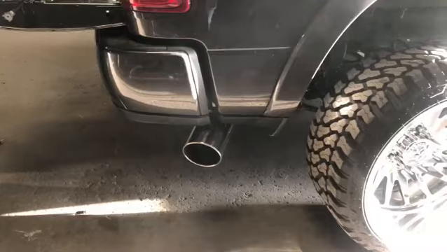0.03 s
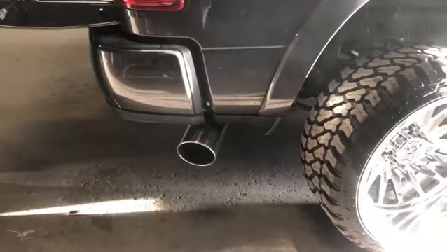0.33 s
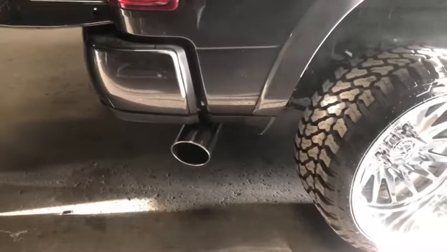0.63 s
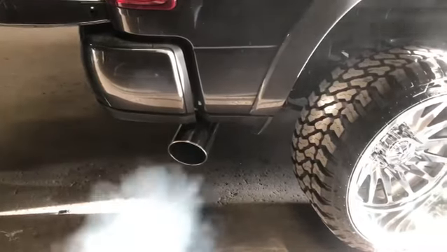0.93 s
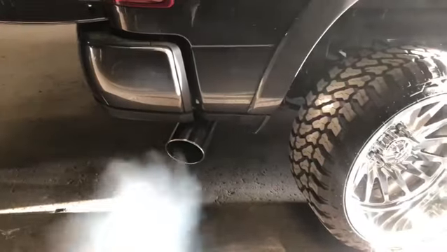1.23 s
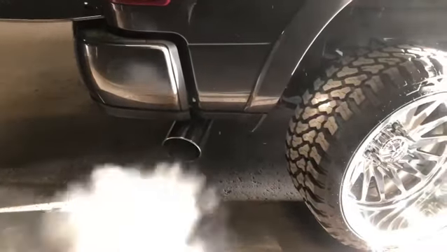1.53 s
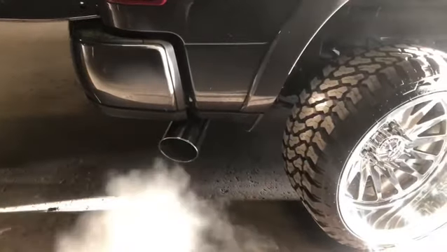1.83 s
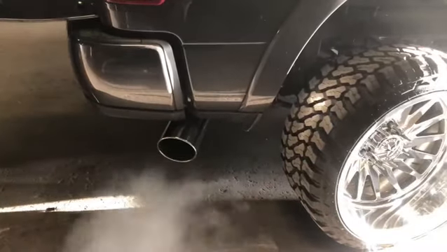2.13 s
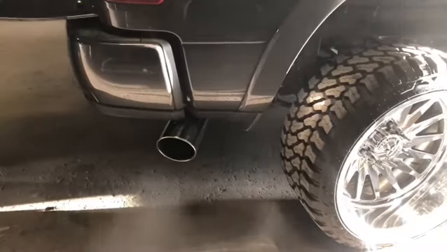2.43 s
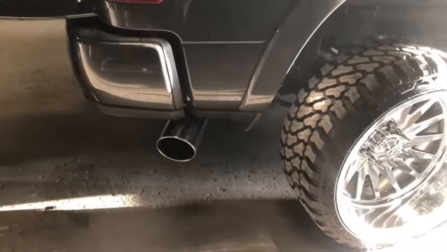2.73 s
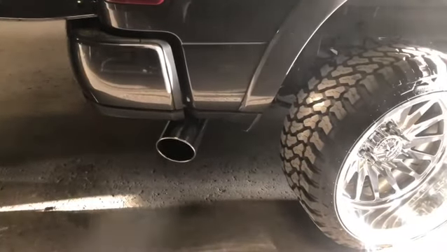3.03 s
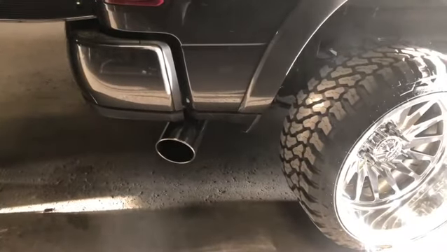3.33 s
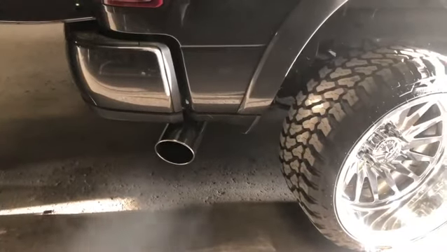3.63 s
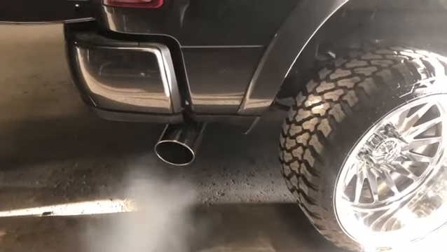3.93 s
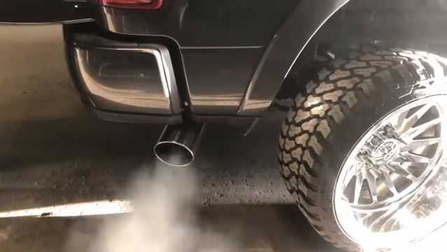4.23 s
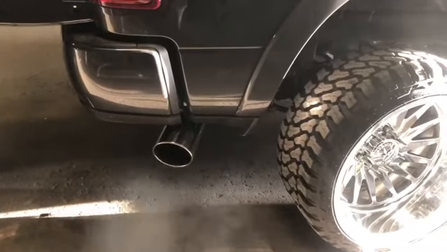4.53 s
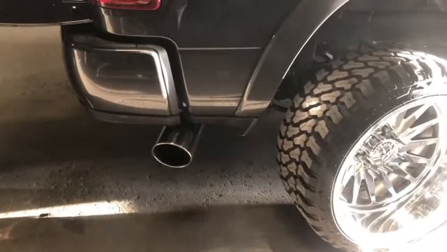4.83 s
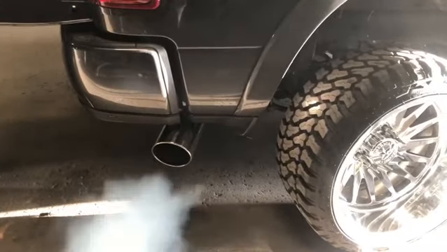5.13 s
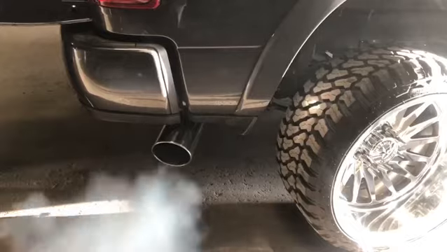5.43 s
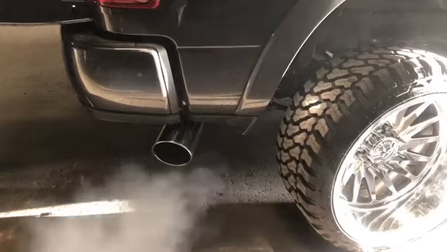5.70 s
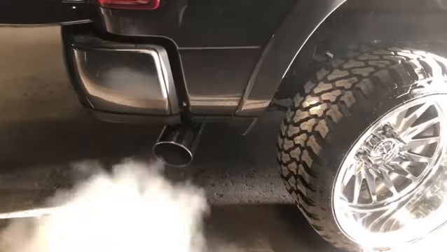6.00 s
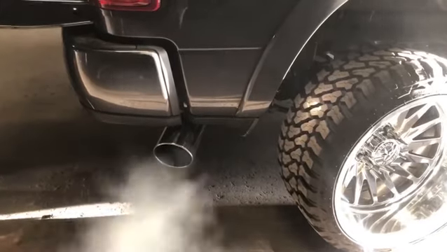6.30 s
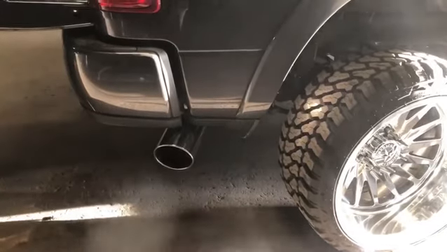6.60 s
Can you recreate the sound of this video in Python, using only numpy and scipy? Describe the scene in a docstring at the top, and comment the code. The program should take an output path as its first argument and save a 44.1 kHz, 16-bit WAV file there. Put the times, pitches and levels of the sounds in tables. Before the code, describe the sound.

A diesel pickup idles briefly, then revs three times with a throbbing, rasping exhaust bark and a faint turbo whine between revs.

```python
"""Outdoors among walls, by the tailpipe of a straight-six turbo diesel pickup: it idles, revs three times.
Firing pulses ring the pipe into a throb and a bark, under a drone of booming crankshaft orders.
Gas rasps, hisses and spits at the mouth and buffets the air; a howl climbs as boost builds.
Thin metal chirps as the first rev takes hold, and the turbo whines down between the revs.
The ground and nearby walls answer."""
import sys
import numpy as np
from scipy import signal
from scipy.fft import rfft, irfft, next_fast_len
from scipy.io import wavfile
from scipy.ndimage import uniform_filter1d

SR = 44100
rng = np.random.default_rng(int(sys.argv[2]) if len(sys.argv) > 2 else 0)


def unload_wav(signal):
    """Save mono or channel-first audio to the path in sys.argv[1] as 16-bit WAV at rate SR, clipped to [-1, 1]."""
    wavfile.write(
        sys.argv[1],
        SR,
        np.round(np.clip(np.atleast_2d(signal).T, -1, 1) * 32767).astype(np.int16),
    )


N = 293706

# pedal moves: start_s, target_turns_per_s, fuel_share, gas_flow (1 is about full), flow_glide_s
PEDAL = [(0.431, 50.2, 0.99, 1, 0.048), (1.1, 58.3, 1, 0.93, 0.092), (1.369, 34.8, 0.1, 0.44, 0.096),
         (1.45, 7.06, 0, 0.06, 0.063), (2.765, 43.1, 0.77, 0.67, 0.11), (3.12, 36.9, 0.57, 0.53, 0.065),
         (3.361, 47.6, 1, 0.84, 0.23), (3.75, 34.2, 0.47, 0.68, 0.079), (3.84, 7, 0.1, 0.17, 0.34),
         (4.775, 50.3, 1, 0.86, 0.05), (5.1, 57.5, 0.98, 1.05, 0.12), (5.619, 32.4, 0, 0.9, 0.061),
         (5.799, 6.5, 0.01, 0.02, 0.44)]
# the three firings of one crankshaft turn: size_db, late_turns
FIRINGS = [(11.5, 0.0016), (4.5, 0.0328), (4.5, -0.0162)]
# how the exhaust system favours an order gliding through it: pitch_hz, gain_db
BOOM = [(40, -49), (60, -22), (72, -26.5), (85, -35), (97, -12.5), (115, -9.5), (135, -12.5), (150, -3),
        (172, 2.5), (185, -1.5), (200, 6), (218, -6.5), (240, 0), (270, -8.5), (305, -5), (340, -16),
        (380, -1), (403, -10.5), (425, -10.5), (460, -8), (510, -7), (555, -5), (597, -1), (640, -3),
        (690, -0.5), (760, -3), (810, -5), (900, -9), (1000, -16)]


def exhaust(speed, turns, fuel, gas_db):
    """Firing pulses ring the pipes and tear the gas; a louder bark brings a harder, loaded tone."""
    throb_db, bark_db, rasp_db, hiss_db, fizz_db = gas_db
    load = np.clip((bark_db + 37.5) / 13, 0, 1)
    lope = (1 - load) * np.cos(2 * np.pi * turns)  # running light, it chugs once a turn
    pulses = steady(firings(turns, scatter_db=-1.0, jitter_turns=0.0017, rebound_db=-9.5))
    rough = steady(puffs(pulses, decay_s=0.0085, depth=0.17, flutter_db=5.0))
    return (amp(throb_db - 1.5 + 2.5 * lope) * throb(turns, rough, load)
            + amp(bark_db - 1.43) * growl(speed, turns, fuel, bark(pulses, rough, load))
            + amp(rasp_db - 1.5 + 0.38 * lope) * (rasp(pulses, load) + howl(speed, turns, fuel))
            + hiss(pulses, load, hiss_db, fizz_db))


def firings(turns, scatter_db, jitter_turns, rebound_db):
    """One pulse per firing, uneven from cylinder to cylinder, and its rebound half a firing later."""
    count = len(FIRINGS)
    k = np.arange(int(turns[-1] * count))
    size_db, late = np.array(FIRINGS)[k % count].T
    chance = rng.standard_normal((len(k), 2))
    angle = k / count + late + jitter_turns * chance[:, 0]
    size = amp(size_db + scatter_db * chance[:, 1])
    train = lambda at: np.bincount(np.interp(at, turns, np.arange(N)).astype(int), size, N)
    return train(angle) + amp(rebound_db) * train(angle + .5 / count)


def puffs(pulses, decay_s, depth, flutter_db):
    """Turbulence that leaps at each pulse and dies away, over a steady stream."""
    gate = steady(signal.lfilter([1], [1, -np.exp(-1 / (decay_s * SR))], pulses))
    share = np.clip(depth, 0, 1)
    return (1 - share + share * gate) * amp(flutter_db * wobble(380)) * rng.standard_normal(N)


def throb(turns, rough, load):
    """Uneven firings burble in the pipe's lowest resonances; load tightens them into a thrum."""
    # pipe resonances: pitch_hz, width_hz, level_db
    pipe = [(106, 50, -6), (132, 6.1, 0), (163, 11, 0.5), (198.4, 7.8, -2), (252.4, 29, -3.5),
            (269.5, 12.6, -9), (293.7, 19.5, -5)]
    loose = firings(turns, scatter_db=6.0, jitter_turns=0.021, rebound_db=-30)
    tight = steady(firings(turns, scatter_db=-4.0, jitter_turns=0.0088, rebound_db=-51.0))
    burble = ring(loose, pipe, low_hz=104.3, high_hz=229.4)
    thrum = ring(tight + 0.62 * rough, pipe, low_hz=142.4, high_hz=348)
    return blend(burble, thrum, load)


def bark(pulses, rough, load):
    """Pulses and rough gas ring the tailpipe into a ragged midrange bark."""
    # tailpipe resonances: pitch_hz, width_hz, level_db
    tailpipe = [(375.5, 13, 1), (412.7, 23, -0.5), (488, 55, -4.5), (534.4, 20, 0.5), (577, 77, -4.5),
                (659, 63, -2), (712, 44, -3.5), (805, 86, -1.5), (834, 51, -0.5), (896, 41, -9),
                (990, 49, -18.5)]
    drive = pulses * (0.43 + 0.53 * load) + 0.87 * rough
    return steady(ring(drive, tailpipe, low_hz=289, high_hz=956))


def growl(speed, turns, fuel, ragged):
    """As revs climb, the ragged bark locks into clean upper orders that swell across resonances."""
    # shaft orders singing through the tailpipe: order, fuelled_db, unfuelled_db
    upper_orders = [(13, -3, -4), (14, -7, 3), (15, 3.5, -1), (16, 1, -6), (17, 2.5, 4.5), (18, 5.5, 0),
                    (19, -3, -4), (20, -2, -1), (21, 1.5, -5), (22, -2, -4), (23, 1.5, 1), (24, -1, -6),
                    (25, -4, -6), (26, -5, -9), (27, -3, -9)]
    # pitched part of the bark's power: turns_per_s, fuelled_share, unfuelled_share
    pitched_share = [(17, .2, 0), (21, .35, .1), (27, .68, .52), (32, .86, .72)]
    tones = np.zeros(N)
    for order, pull_db, coast_db in upper_orders:
        db = fuel * pull_db + (1 - fuel) * coast_db + along(BOOM, order * speed) + 1.5 * wobble(12)
        tones += amp(db) * np.cos(2 * np.pi * (order * turns + rng.random()) + 0.15 * wobble(25))
    pulling, coasting = lookup(pitched_share, speed)
    share = np.clip(fuel * pulling + (1 - fuel) * coasting, 0, 1)
    return np.sqrt(1 - share) * ragged + np.sqrt(share) * steady(tones, size=8000)


def drone(speed, turns, fuel, surge_db):
    """Low shaft orders boom as they glide through the pipe's resonances; unfuelled they chug."""
    # the lead tone in the pipe's resonances: pitch_hz, fuelled_db, unfuelled_db
    lead_levels = [(80, -37, -49), (96, -18.5, -35), (107.6, -11, -40.5), (121.3, -17.5, -28.5),
                   (127.6, -25.5, -19), (137, -22.5, -22), (152.5, -13.5, -17), (165, -12.5, -11),
                   (189, -20, -20.5), (198, -12, -15), (212, -17.5, -21.5)]
    # weaker shaft orders: order, fuelled_db, unfuelled_db
    weak_orders = [(2, -28, -8.5), (3, -28, -14.5), (4, -20.5, -22), (5, -19.5, -25), (7, -26.5, -27),
                   (8, -32.5, -22), (9, -23, -24.5), (10, -35, -28), (11, -27, -22.5), (12, -21.5, -25.5)]
    # unfuelled, they collapse at low revs: turns_per_s, gain_db
    collapse = [(18.5, -17), (22, -9), (25, -4), (28, -1)]

    def tone(order, pull_db, coast_db, drift):
        db = fuel * pull_db + (1 - fuel) * (coast_db + 1.6 * wobble(24)) + 1.7 * wobble(25)
        return np.sqrt(2) * amp(db) * np.cos(2 * np.pi * order * turns + drift + 0.055 * wobble(30))

    lead = 2 * len(FIRINGS)  # twice the firing rate
    out = amp(surge_db) * tone(lead, *lookup(lead_levels, lead * speed), drift=0)
    slack_db, = lookup(collapse, speed)
    for order, pull_db, coast_db in weak_orders:
        drift = np.pi * wobble(2)  # the weaker tones drift in phase and blend into a smooth drone
        out += amp(along(BOOM, order * speed)) * tone(order, pull_db, coast_db + slack_db, drift)
    return out


def rasp(pulses, load):
    """Gas tears at the pipe's mouth: a rattle running light, deeper puffs under load."""
    # rasp colour, running light and loaded: freq_hz, gain_db
    light_rasp = [(700, -23), (860, -13), (1020, -18), (1150, -2.5), (1290, 3), (1420, -2.5), (1630, -7.5),
                  (1780, 2), (1950, -11.5), (2080, -5.5), (2250, -6), (2450, -4), (2750, -14), (2950, -42),
                  (3400, -35)]
    loaded_rasp = [(850, 0.5), (1000, -8), (1130, -0.5), (1280, 3), (1480, 1.5), (1640, -6.5), (1760, 5.5),
                   (2050, -2), (2250, -7.5), (2480, -2.5), (2750, -1), (2980, -8.5), (3500, -5)]
    tearing = puffs(pulses, decay_s=0.012, depth=0.11 + 0.45 * load, flutter_db=2)
    return blend(coloured(tearing, light_rasp), coloured(tearing, loaded_rasp), load)


def howl(speed, turns, fuel):
    """Under boost a flow resonance whoops up through the rasp, beating with the firings."""
    # the climbing resonance: turns_per_s, pitch_hz, level_db
    climb = [(24.52, 900, -17), (25.8, 1020, 0), (26.89, 1200, -1.5), (28.86, 1400, 1.5),
             (30.08, 1490, 2.5), (31.15, 1780, 3.5), (32.47, 2050, -1), (33.51, 2500, -3.5),
             (34.96, 2900, -6)]
    # the pipe's colour on it: freq_hz, gain_db
    pipe_colour = [(700, -20), (1000, -1.5), (1250, -1.5), (1500, 3), (1640, -8), (1770, 1.5), (2080, 0),
                   (2300, -9), (2550, -3), (2900, -2), (3400, -12)]
    beat = 1 + 0.26 * np.cos(2 * np.pi * len(FIRINGS) * turns)
    hz, db = lookup(climb, speed)
    core = steady(narrow_noise(hz, width_hz=230), size=900)
    skirt = narrow_noise(1.05 * hz, width_hz=850)
    whoop = amp(-4.5) * core + amp(-2.5) * skirt
    return coloured(fuel ** 2 * amp(db + wobble(60)) * whoop * beat, pipe_colour)


def hiss(pulses, load, hiss_db, fizz_db):
    """The free jet hisses in puffs, with a fizz on top."""
    # hiss and fizz colours, running light and loaded: freq_hz, gain_db
    light_hiss = [(2700, -2), (3130, 0.5), (3350, 0), (3580, 3), (3760, 6), (4000, -7), (4200, 3),
                  (4700, -1.5), (5100, 0), (5850, 2.5), (6450, -10), (7400, -15.5), (8800, -27)]
    loaded_hiss = [(2600, -62), (3100, 4), (3400, -6), (3800, 6.5), (4250, 3), (4750, 6.5), (5400, 4.5),
                   (5900, 3), (6500, 0.5), (7500, -2), (9000, -16)]
    light_fizz = [(6200, -14), (7400, -5.5), (8800, 0), (11000, -3), (12300, -6), (13000, -8), (15700, -21)]
    loaded_fizz = [(6200, -18), (7500, -6.5), (9000, 2), (10500, -1), (12200, -3), (12900, -15),
                   (14500, -11), (15700, -38)]
    jet = puffs(pulses, decay_s=0.015, depth=0.051 + 0.33 * load, flutter_db=1.0)
    body = blend(coloured(jet, light_hiss), coloured(jet, loaded_hiss), load)
    fizz = blend(coloured(jet, light_fizz), coloured(jet, loaded_fizz), load)
    return amp(hiss_db - 0.42) * body + amp(fizz_db - 0.6) * fizz


def idle(turns):
    """Before the first rev, neighbouring shaft orders beat into a slow lope."""
    # tones standing in the pipe: order, level_db
    idle_orders = [(6, -31.5), (9, -29.5), (10, -57), (11, -25.5), (12, -31), (17, -34)]
    # how far the engine has settled into idle: time_s, gain_db
    settling = [(.08, -17), (.16, -4), (.43, 2.5), (.52, 5), (.6, -83)]
    tones = sum(amp(db + 1.1 * wobble(9.5)) * np.cos(2 * np.pi * order * turns + 0.19 * wobble(7))
                for order, db in idle_orders)
    return np.sqrt(2) * amp(curves(settling)[0]) * tones


def spits():
    """Short cracks of gas, each with a dull thump."""
    # spits in the exhaust: start_s, level_db, thump_gain_db
    hits = [(0.4569, -16, 6), (.482, -12, 8), (1.2935, -2, -21), (1.698, -15, 11), (5.5862, 2.5, -4)]
    out, t = np.zeros(N + SR), np.arange(SR // 20) / SR
    for s, db, thump_db in hits:
        crack = amp(-4.5 - 60 * t / 0.04) * rng.standard_normal(len(t))
        thump = amp(thump_db + 4.5 - 60 * t / 0.0091) * np.sin(2 * np.pi * 480 * t)
        out[round(s * SR):][:len(t)] += amp(db) * (crack + thump)
    return coloured(out[:N], [(100, -3), (2000, 2.5), (5000, 0.5), (10000, -4.5), (15500, -34)])


def chirps():
    """Thin metal rings briefly as the first rev takes hold."""
    # metallic pings: start_s, pitch_hz, level_db, t60_s
    pings = [(.456, 3700, -9, 0.04), (.478, 5400, -18, 0.04)]
    out, t = np.zeros(N), np.arange(SR // 10) / SR
    attack = 1 - np.exp(-t / 0.0015)
    for s, hz, db, t60 in pings:
        out[round(s * SR):][:len(t)] += amp(db - 60 * t / t60) * attack * np.sin(2 * np.pi * hz * t)
    return out


def turbo():
    """The thin, airy whine of the turbo's blades coasting down."""
    # one list per coast: time_s, pitch_hz, level_db
    coasts = [
        [(2.25, 11800, -61), (2.42, 10800, -46), (2.55, 9950, -43), (2.63, 9400, -50), (2.72, 9030, -42),
         (2.78, 9090, -38), (2.92, 9700, -50)],
        [(4.4, 11600, -58), (4.56, 10700, -44.5), (4.68, 10050, -44.5), (4.77, 9750, -51), (4.85, 10030, -56)],
    ]
    out, t = np.zeros(N), np.arange(N) / SR
    for rows in coasts:
        hz, db = curves(rows)
        sounding = (t > rows[0][0]) & (t < rows[-1][0])
        out += sounding * amp(db + 1.5 * wobble(30)) * narrow_noise(hz, width_hz=750)
    return out


def buffet(level_db):
    """The stream of gas buffets the air in front of the pipe: a low, gusty rumble."""
    rumble = coloured(rng.standard_normal(N), [(10, -8), (28, -25), (45, -1), (110, 3)])
    return amp(level_db + 10 + 2.0 * wobble(7)) * steady(rumble, size=8000)


def walls(x):
    """A short, diffuse echo off the ground and walls, dying sooner in the treble."""
    # decay off the ground and walls: freq_hz, t60_s
    decay = [(150, 0.48), (1500, 0.14), (10000, 0.042)]
    size = SR // 4  # a fresh tail each quarter second evens out the colouring
    count = N // size + 1
    blocks = np.pad(x, (0, count * size - N)).reshape(count, size)
    hz, t, noise = signal.stft(rng.standard_normal((count, size)), SR, nperseg=256)
    tails = signal.istft(noise * amp(-60 * t / along(decay, hz)[:, None]), SR, nperseg=256)[1][:, :size]
    echoes = signal.fftconvolve(blocks, tails / np.linalg.norm(tails, axis=1, keepdims=True), axes=1)
    at = np.arange(count)[:, None] * size + np.arange(echoes.shape[1])
    return np.bincount(at.ravel(), echoes.ravel())[:N]


def crankshaft(idle_hz=11.8, spin_up_s=1.15, spin_down_s=.785):
    """Turns per second: the flywheel eases towards each pedal target, never dropping below idle."""
    speed = np.full(N, idle_hz)
    for s, target, *_ in PEDAL:
        i = round(s * SR)
        lag_s = spin_up_s if target > idle_hz else spin_down_s
        speed[i:] = np.maximum(target + (speed[i] - target) * fade(s, lag_s)[i:], idle_hz)
    return speed


def pedal(fuel_lag_s=0.071):
    """Fuel and gas flow glide after the pedal; revved goes from 0 to 1 at its first press."""
    times, _, fuels, flows, lags = np.transpose(PEDAL)
    fuel = np.clip(glide(times, fuels, np.full(len(times), fuel_lag_s)), 0, 1)
    return fuel, glide(times, flows, lags), ramp(times[0], fuel_lag_s)


def levels(speed, flow, revved):
    """The exhaust's mix in dB: speed sets it, gas flow moves it from coasting to pulling."""
    # pedal down and pedal up: turns_per_s, throb_db, bark_db, rasp_db, hiss_db, fizz_db, buffet_db
    pulling = [(14, -13, -19, -22, -24, -32, -50), (19.4, -19.5, -18.5, -26, -25.5, -32, -46),
               (23.9, -18.5, -17, -20.5, -22.5, -31, -61), (27.5, -25.5, -18, -19.5, -22, -31.5, -51),
               (29.5, -28, -18.5, -16.5, -22.5, -32, -53), (38.3, -21, -18.5, -18, -20, -31.5, -53)]
    coasting = [(12.6, -38, -45.5, -38, -36, -38.5, -59), (14, -32.5, -43, -38, -38.5, -41.5, -56),
                (19.65, -23, -35.5, -38, -35, -38, -73), (24.5, -25, -25.5, -30.5, -31, -36, -61),
                (27.5, -27, -20.5, -27, -29.5, -35, -38), (35, -19, -21.5, -20.5, -28, -40.5, -54)]
    # the opening idle: the same six levels
    at_idle = [-27.5, -34, -34.5, -34, -42, -56]
    # brief swells and dips of the gas: centre_s, half_width_s, bark_db, rasp_db, hiss_db, fizz_db
    gas_swells = [(.09, .035, 0, 4.5, -0.5, 2), (.52, 0.027, 0.5, 2, 2, 1), (.745, 0.086, 1, 1, 2.5, 6.5),
                  (1.07, 0.039, -2.5, -1.5, -4.5, -4.5), (1.375, 0.019, -1, 1, 4.5, 4),
                  (1.455, 0.017, 1, -5, -2, -3), (1.87, 0.049, -4.5, -1.5, 1, 1.5),
                  (2.64, 0.077, -1, -4.5, -5.5, -8), (2.78, 0.064, -0.5, -2, 3, 4.5),
                  (3.22, 0.12, -4.5, -1.5, 3, 1.5), (3.72, 0.11, -2.5, 1, 2, 0.5),
                  (4.06, 0.038, -1.5, 2, 2, 1), (4.22, 0.099, 0.5, 3, -0.5, -1),
                  (4.86, 0.029, 3.5, 2, 2, -0.5), (5.08, 0.072, 0.5, 3, 2, 1.5),
                  (5.47, 0.0088, 3, 4.5, 6.5, 3), (5.76, 0.029, -4, 2, 3.5, 6),
                  (5.95, 0.13, 0.5, -1, 1, 0.5), (6.07, 0.04, -1, 1.5, 1.5, 2),
                  (6.25, 0.058, -3, -0.5, -2, -1), (6.48, 0.23, 0.5, -3.5, -2, 0.5)]
    light = revved * lookup(coasting, speed) + np.outer(at_idle, 1 - revved)
    mix_db = light + flow * (lookup(pulling, speed) - light)
    flicker_db = np.outer([0.4, 0.44, 0.95, 1.2], wobble(22))
    mix_db[1:5] += swells(gas_swells) + flicker_db  # bark, rasp, hiss, fizz
    return mix_db


def amp(db):
    """Decibels to gain."""
    return 10 ** (np.asarray(db) / 20)


def steady(x, size=4400):
    """x with its running rms held at 1."""
    return x / np.sqrt(np.abs(uniform_filter1d(uniform_filter1d(x ** 2, size), size)) + 1e-12)


def blend(light, loaded, load):
    """Cross-fade from the light-running sound to the loaded one, at rms 1."""
    return steady((1 - load) * steady(light) + load * steady(loaded))


def wobble(rate):
    """A smooth random curve, rate knots a second."""
    count = 8
    knots = signal.resample_poly(rng.standard_normal(int(N * rate / SR) + 4), count, 1)
    return np.interp(np.arange(N) * (count * rate / SR), np.arange(len(knots)), knots)


def narrow_noise(hz, width_hz):
    """Noise of rms 1 around a moving frequency."""
    phase = 2 * np.pi * np.cumsum(hz) / SR
    band = wobble(width_hz) * np.cos(phase) + wobble(width_hz) * np.sin(phase)
    return band / np.sqrt(np.mean(band ** 2) + 1e-20)


def filtered(x, response):
    """x times a complex response of frequency."""
    m = next_fast_len(N + SR // 2)
    return irfft(rfft(x, m) * response(np.fft.rfftfreq(m, 1 / SR)), m)[:N]


def coloured(x, eq):
    """x through an EQ curve of (freq_hz, gain_db), silent beyond its ends."""
    return filtered(x, lambda f: amp(along(eq, f)) * (f > eq[0][0]) * (f < eq[-1][0]))


def ring(x, modes, low_hz, high_hz):
    """x through resonances of alternating sign, with steep skirts outside their band."""
    body = filtered(x, lambda f: sum(
        (-1) ** k * amp(db) * 1j * f * width / (hz * hz - f * f + 1j * f * width)
        for k, (hz, width, db) in enumerate(modes)))
    return signal.sosfilt(signal.butter(3, [low_hz, high_hz], 'band', fs=SR, output='sos'), body)


def along(points, hz):
    """(freq_hz, value) points read on a log axis."""
    f, v = np.transpose(points)
    return np.interp(np.log(hz + 1), np.log(f), v)


def lookup(rows, at):
    """Each column after the first, read where the first equals at."""
    key, *cols = np.transpose(rows)
    return np.array([np.interp(at, key, c) for c in cols])


def curves(rows):
    """One value per sample for each column after the time."""
    return lookup(rows, np.arange(N) / SR)


def swells(rows):
    """Each dB column as a sum of smooth humps in time."""
    t = np.arange(N) / SR
    return sum(np.outer(db, np.exp(-((t - s) / width) ** 2)) for s, width, *db in rows)


def ramp(start_s, length_s):
    """0 before the start, rising straight to 1."""
    return np.clip((np.arange(N) / SR - start_s) / length_s, 0, 1)


def fade(start_s, decay_s):
    """1 before the start, then dying away."""
    return np.exp(-np.maximum(np.arange(N) / SR - start_s, 0) / decay_s)


def glide(times, values, lengths):
    """From 0, move to each new value in a straight line."""
    steps = np.diff(values, prepend=0)
    return sum(step * ramp(s, length) for s, step, length in zip(times, steps, lengths))


def scene():
    """Pedal and crankshaft drive the engine; the exhaust, spits and chirps echo off the walls."""
    # the low end booms and sags: centre_s, half_width_s, lead_tone_db, throb_db
    surges = [(.82, 0.043, -5, 1.5), (1.46, 0.042, -14, 1), (2.17, 0.12, -4, -4.5),
              (3.05, 0.073, 4.5, -1.5), (3.46, 0.053, 4.5, 2.5), (3.62, 0.097, -2.5, 4),
              (3.95, 0.092, 3.5, 7), (4.87, 0.072, 0, 0.5), (5.7, 0.061, 5, 5.5), (5.95, .1, -0.5, 5),
              (6.29, 0.081, -3, 2.5)]
    speed = crankshaft()
    turns = np.cumsum(speed) / SR
    fuel, flow, revved = pedal()
    throb_db, *gas_db, buffet_db = levels(speed, flow, revved)
    lead_surge_db, throb_surge_db = swells(surges)
    gas = exhaust(speed, turns, fuel, [throb_db + throb_surge_db, *gas_db]) + spits() + chirps()
    tones = drone(speed, turns, fuel, lead_surge_db) + idle(turns)
    return (tones + gas + amp(-11) * walls(gas) + buffet(buffet_db) + turbo())[None]


def record(dry):
    """The microphone opens after a moment, rounds off the peaks and has a band limit."""
    open_s, ceiling, top_hz = .083, .95, 15750
    x = dry[0] * (np.arange(N) / SR > open_s)
    x = x / (1 + np.abs(x / ceiling) ** 6) ** (1 / 6)
    return filtered(x, lambda hz: hz < top_hz)[None]


dry = scene()
out = record(dry)
unload_wav(out)
```